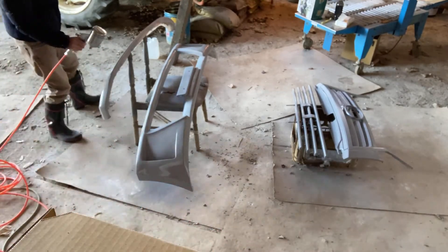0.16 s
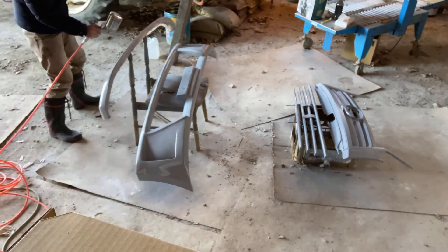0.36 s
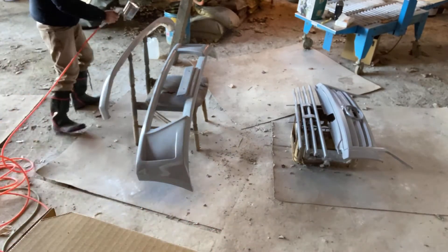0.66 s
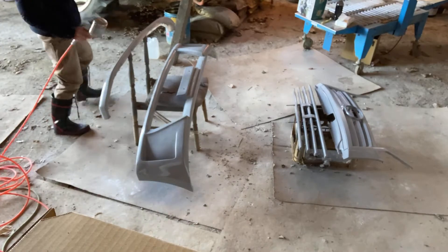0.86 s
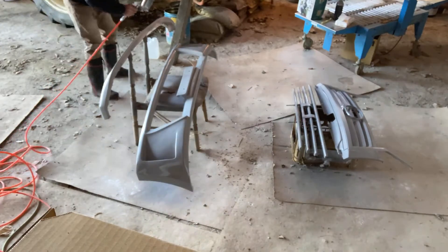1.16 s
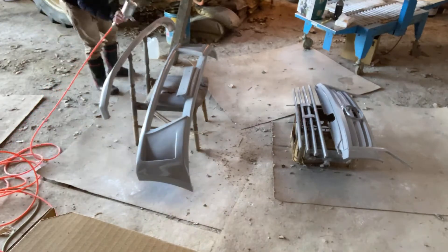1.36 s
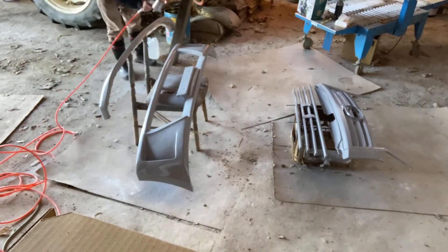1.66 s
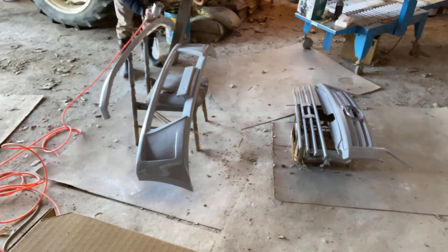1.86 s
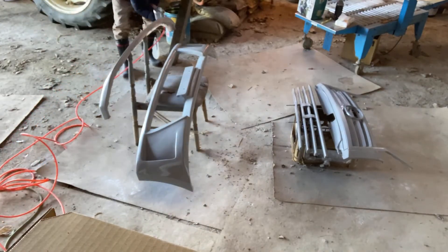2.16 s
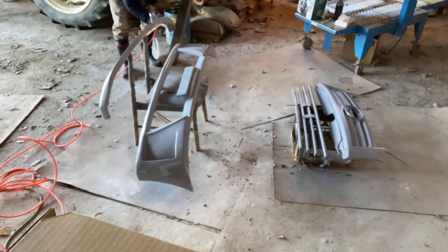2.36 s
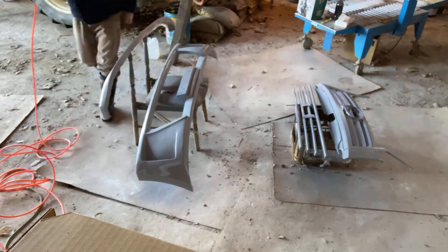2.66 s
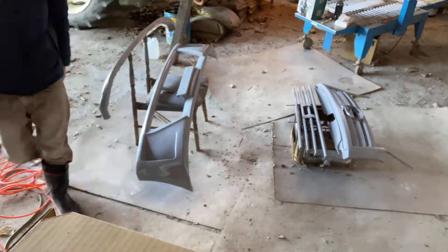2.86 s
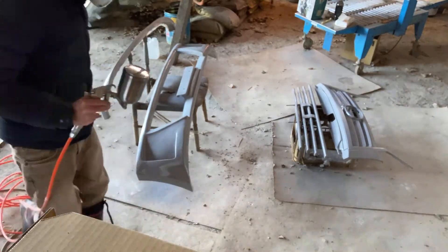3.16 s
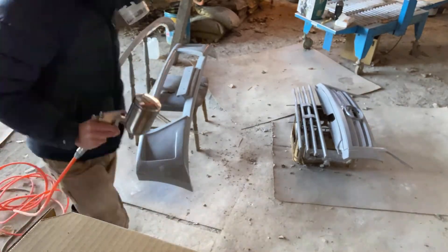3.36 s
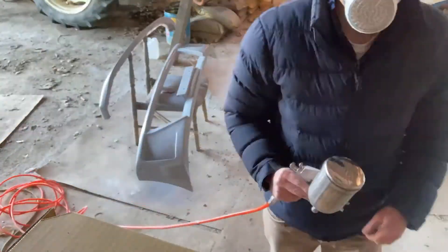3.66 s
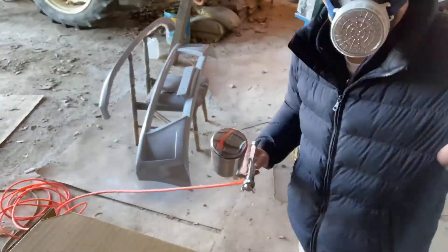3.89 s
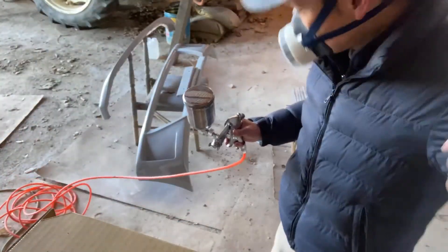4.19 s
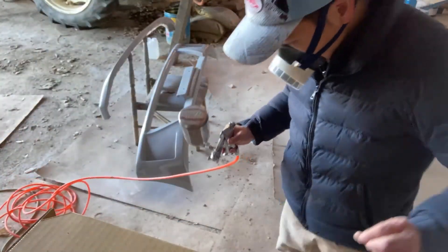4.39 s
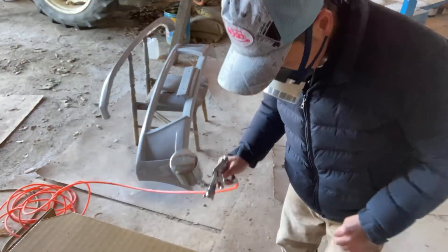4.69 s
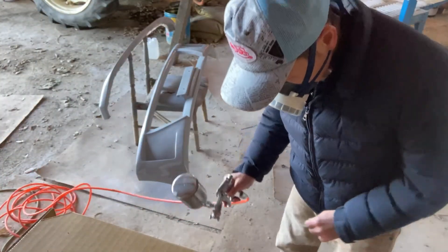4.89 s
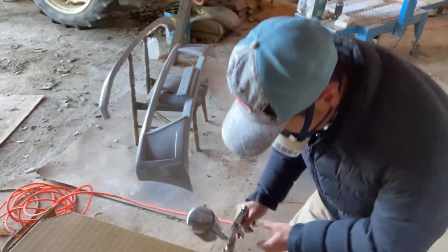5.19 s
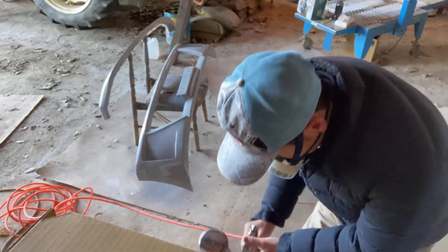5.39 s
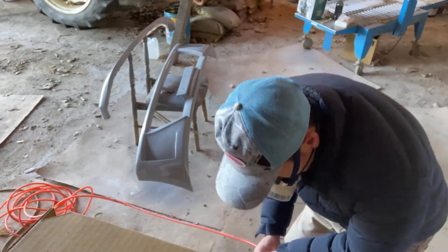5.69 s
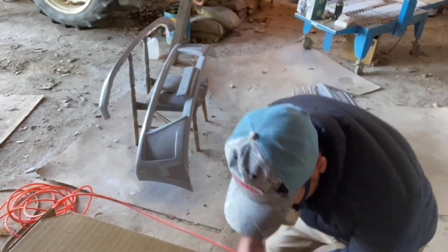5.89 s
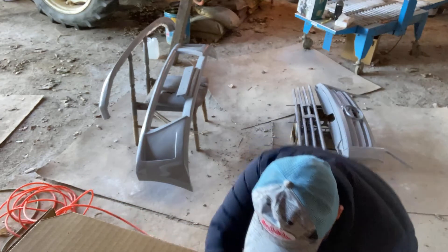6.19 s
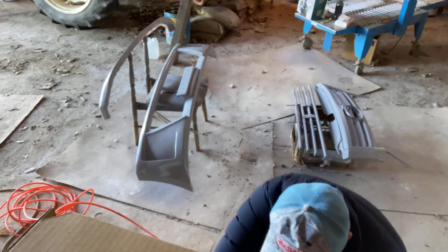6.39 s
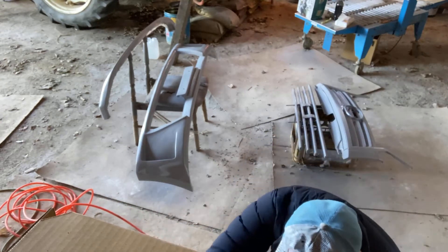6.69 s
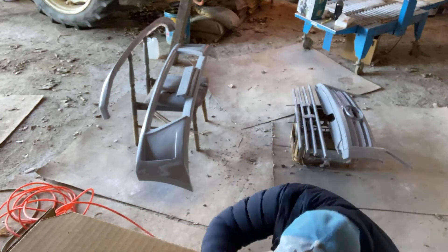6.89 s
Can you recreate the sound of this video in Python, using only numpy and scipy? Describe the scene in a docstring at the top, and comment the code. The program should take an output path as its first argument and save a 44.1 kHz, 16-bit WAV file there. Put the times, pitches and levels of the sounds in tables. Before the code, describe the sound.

Quiet electric-like hum and whine for four seconds, then a piston air compressor suddenly pounds loudly, clattering and fluttering with a soft air hiss.

```python
"""A barn workshop: a two-cylinder air compressor runs while a painter moves about with a spray gun.
For four seconds time runs about six times too fast: intake strokes fuse into a faint hum and whine.
Then time drops to its true pace: a loud, throbbing drone of tones at multiples of the stroke rate,
with one burst of valve flutter a stroke, clattering noise and reed ticks. Shaped noise makes the
air that leaks from the gun, the scuffs of boots, hose and jacket, and the footfalls."""
import sys
import numpy as np
from scipy.fft import rfft, irfft, next_fast_len
from scipy.io import wavfile
from scipy.ndimage import map_coordinates

SR = 44100
rng = np.random.default_rng(int(sys.argv[2]) if len(sys.argv) > 2 else 0)


def generate_wav(signal):
    """Clip the signal to [-1, 1] and save it as 16-bit WAV at the path in sys.argv[1]."""
    frames = np.transpose(np.atleast_2d(signal))
    scaled = np.clip(frames, -1, 1) * 32767
    pcm = np.round(scaled).astype(np.int16)
    wavfile.write(sys.argv[1], SR, pcm)


N = 310905

CUT = 4.042  # moment when time drops to its true pace (s)
STROKE_HZ = 28.95  # strokes a second at true pace; one "turn" below is one stroke
HASTE = 6  # how many times faster the hastened clatter runs


def amp(db):
    """Decibels to gain."""
    return 10 ** (np.asarray(db) / 20)


def unit(x):
    """Scaled to rms 1."""
    return x / np.sqrt(np.mean(x ** 2) + 1e-20)


def clock():
    """The time of every sample (s)."""
    return np.arange(N) / SR


def along(points, hz):
    """Values at hz between (Hz, value) points, on a log frequency axis."""
    f, v = np.transpose(points)
    return np.interp(np.log(hz + 1), np.log(f + 1), v)


def curves(rows):
    """One value per sample for each column after the time."""
    s, *cols = np.transpose(rows)
    return [np.interp(clock(), s, c) for c in cols]


def wobble(rate):
    """A smooth random curve, rate knots a second."""
    knots = rng.standard_normal(int(N * rate / SR) + 4)
    return map_coordinates(knots, [clock() * rate])


def filtered(x, response):
    """x shaped by a complex response of frequency."""
    m = next_fast_len(N + SR // 2)
    spectrum = rfft(x, m) * response(np.fft.rfftfreq(m, 1 / SR))
    return irfft(spectrum, m)[..., :N]


def bell(f, hz, octaves):
    """A bell of gain around hz."""
    return np.exp(-.5 * (np.log2((f + 1) / hz) / octaves) ** 2)


def band(hz, octaves):
    """Stereo noise of rms 1 in a bell around hz."""
    return unit(filtered(rng.standard_normal((2, N)), lambda f: bell(f, hz, octaves)))


def placed(x, balance, lag_ms):
    """Sound reaches the right microphone lag_ms after the left; balance is left minus right in dB."""
    side = np.array([[.5], [-.5]])

    def at_microphones(hz):
        delay = np.exp(2j * np.pi * hz * side * lag_ms / 10 ** 3)
        return amp(side * along(balance, hz)) * delay
    return filtered(x, at_microphones)


def hum(hz, db):
    """The motor's iron buzzes at twice the mains frequency: a sine of rms level db."""
    return amp(db) * np.sqrt(2) * np.sin(2 * np.pi * hz * clock())


def steps():
    """Boots land on the loose sheets that cover the floor: a sudden, dull tap that dies away."""
    # Each row: landing in seconds, level in dB.
    footfalls = [(.91, -64), (1.015, -65), (1.52, -67), (2.624, -57), (2.84, -64)]
    t60_s = .13
    t = clock()
    taps = sum((t > s) * amp(db - 60 * np.abs(t - s) / t60_s) for s, db in footfalls)
    return band(hz=800, octaves=0.79) * taps


def scuffs():
    """Boots, hose and jacket scuff: short swells of rubbing noise as the painter steps and handles hose."""
    # Each row: peak in seconds, length in s, centre in Hz, width in octaves, level in dB.
    rubs = [(3.53, .15, 4700, .25, -68), (3.973, .022, 380, .3, -61), (5.218, .017, 1850, .25, -38.5)]
    t = clock()
    out = np.zeros((2, N))
    for s, length, hz, octaves, db in rubs:
        out += amp(db) * band(hz, octaves) * np.exp(-2 * ((t - s) / length) ** 2)
    return out


def air_leak():
    """Air hisses softly from the gun's coupling, close by on the right; it wavers and twice spurts."""
    # The hiss's colour. Each row: frequency in Hz, relative level in dB.
    air_colour = [(500, -8), (4000, 13), (6500, 4.5), (8300, 9), (10000, 1), (13000, 4.5), (15500, -2)]
    # The hiss's level before its waver. Each row: time in seconds, level in dB.
    leak_levels = [(4.1, -50), (4.35, -49), (4.58, -51), (4.85, -48.5), (5.55, -50), (6.05, -49.5),
                   (6.6, -51.5), (7, -50)]
    # Short spurts of air. Each row: peak in seconds, length in s, level in dB.
    puffs = [(5.232, 0.043, -46.5), (6.875, .018, -50)]
    noise = rng.standard_normal((3, N))
    nearly_mono = noise[0] + 0.045 * noise[1:]
    hiss = unit(filtered(nearly_mono, lambda hz: amp(along(air_colour, hz))))
    level_db, = curves(leak_levels)
    spurts = sum(amp(db) * np.exp(-2 * ((clock() - s) / length) ** 2) for s, length, db in puffs)
    spurts = spurts * band(hz=8700, octaves=0.41)[0]
    hiss = amp(level_db + 0.68 * wobble(24)) * hiss
    # negative lag: the right microphone hears it first
    return placed(hiss + spurts, [(8000, 0)], lag_ms=-0.2447)


def rattle(turns, pace):
    """Three unrelated noises; part of each is a cylinder's own pattern, back every second stroke."""
    # How much is the same on each stroke of one cylinder.
    # Each row: frequency in Hz at true pace, share of the power from 0 to 1.
    repeats = [(400, .25), (850, .28), (1100, .62), (1600, .58), (2500, .38), (4000, .2), (7000, .08)]
    size = round(2 * SR / STROKE_HZ / pace)
    place = turns / 2 % 1 * size
    patterns = rng.standard_normal((3, size))
    same = np.array([map_coordinates(row, [place], mode="grid-wrap") for row in patterns])
    fresh = rng.standard_normal((3, N))

    def share(hz):
        return np.clip(along(repeats, hz / pace), 0, 1)
    same = filtered(same, lambda hz: np.sqrt(share(hz)))
    return same + filtered(fresh, lambda hz: np.sqrt(1 - share(hz)))


def swell(turns):
    """The clatter's rise in dB before scaling: up as the valve opens, a hold, then dying away."""
    start, attack, hold, release = 0.862, 0.048, 0.32, 0.26  # shares of the turn
    corners = np.cumsum([0, attack, hold, release])
    return 6.5 * np.interp((turns - start) % 1, corners, [0, 1, 1, 0])


def clatter(turns, pace, spectrum, apart, throb, ringing):
    """Valve and bearing noise of rms 1 swells once a stroke and rings the casing."""
    # Resonances and dips of the cylinder head and tank, with dB to be scaled by ringing.
    # Each row: frequency in Hz at true pace, width in Hz, gain in dB.
    casing = [(980, 64, -3), (1080, 130, 3), (1408, 102, -18), (1523, 83, 6), (1860, 80, -14),
              (1941, 30, 5.5), (2057, 33, 5.5), (2470, 47, 11), (2804, 34, 10.5), (3640, 42, 12.5),
              (3830, 88, -22), (4160, 160, 8), (5420, 210, 13)]
    noise = rattle(turns, pace)
    # direct sound is common to both sides, the walls' answer is not
    pair = (noise[0] + apart * noise[1:]) * amp(throb * swell(turns))

    def ring(f):
        total = 1
        for centre, width, db in casing:
            resonance = 1j * f * width / (centre * centre - f * f + 1j * f * width)
            total = total + (amp(ringing * db) - 1) * resonance
        return total
    return unit(filtered(pair, lambda hz: amp(along(spectrum, hz)) * ring(hz / pace)))


def ticks(turns, scatter_db, scatter_share):
    """Reeds slap stop and seat: sharp, quickly dying ticks, each cylinder's at its own points of the turn."""
    # Rows alternate between the two cylinders. Each row: point in the turn, decay to 1/e as
    # a share of the turn, centre in Hz, mean level in dB.
    slaps = [(-.01, .13, 3600, -36), (.175, .1, 3200, -35.5), (.02, .12, 2200, -38), (-.03, .1, 1300, -35)]
    out, noise = np.zeros((2, N)), rattle(turns, 1)
    for cylinder, (point, decay, hz, db) in zip(np.arange(len(slaps)) % 2, slaps):
        # each cylinder strikes every second stroke, with fresh size and timing
        cycle = np.floor((turns - cylinder) / 2 + 1 / 4).astype(int)
        draws = rng.standard_normal((cycle[-1] - cycle[0] + 1, 2))
        size, slip = draws[cycle - cycle[0]].T
        since = turns - 2 * cycle - cylinder - point - scatter_share * slip
        envelope = (since > 0) * np.exp(-np.abs(since / decay))
        metal = unit(filtered(noise[0] + noise[1:], lambda f: bell(f, hz, octaves=0.27)))
        out += envelope * amp(db + scatter_db * size) * metal
    return out


def flutter(turns, levels, drift_db, top_drift_db, bright_db, count=20):
    """Tones phased as a gulp of air, a reed flapping ever wider and wall echoes; levels set their strength."""
    # Echoes of the intake off floor and near walls. Each row: gain, delay as a share of the turn.
    wall_echoes = [(.59, .129), (.43, .171), (.6, .228)]
    open_share, flaps = .417, 6  # share of the turn that the valve is open, flaps in that time
    grows_db = 6.3  # growth of the swing while the valve is open
    reed_stop = .72  # limit of the downward swing, wider than this swing gets
    gulp, gulp_rise = 1.04, .053  # peak on the swing's scale, rise as a share of the turn
    u = np.linspace(0, 1, 2 ** 11, endpoint=False) / open_share
    swing = np.sin(2 * np.pi * flaps * u) * amp(grows_db * (u - 2)) * (u < 1)
    rise = u * open_share / gulp_rise
    suction = gulp * rise * np.exp(1 - rise)
    orders = np.arange(1, len(levels) + 1)
    burst = rfft(np.maximum(swing, -reed_stop) - suction)[orders]
    echoes = sum(gain * np.exp(-2j * np.pi * orders * delay) for gain, delay in wall_echoes)
    phases = np.angle(burst * (1 + echoes))
    crank = (2 * np.pi * (turns % 1)).astype(np.float32)
    progress = np.linspace(0, count - 1, N)
    out = np.zeros(N)
    for k, ((_, db), phase) in enumerate(zip(levels, phases), 1):
        # each tone's strength drifts as the painter moves through the barn
        height = (k / len(levels)) ** 2
        drift = (drift_db + top_drift_db * height ** 2) * rng.standard_normal(count)
        strength = np.interp(progress, np.arange(count), amp(db + bright_db * height + drift))
        out += strength * np.cos(k * crank + float(phase))
    return np.sqrt(2) * out


def whine():
    """Hastened strokes fuse into a thin, buzzing pitch; its colour shifts as the painter comes near."""
    # It gains a little speed, then sags. Each row: time in seconds, strokes a second.
    stroke_rates = [(0, 174.68), (2.35, 175.56), (4, 174.4)]
    # Gain of the treble. Each row: time in seconds, gain in dB.
    treble = [(0, -0.5), (.5, -2.5), (1.45, -0.5), (2.6, -0.5), (2.9, -5), (3.2, -4), (3.53, 2), (3.7, -3),
              (4, 2.5)]
    # Tones of intake and tank. Each row: multiple of the stroke rate, relative level in dB.
    tones = [(1, -33), (2, -10), (3, -25), (4, -13), (5, -15), (6, -19), (7, -23), (8, -13), (9, -14),
             (10, -14), (11, -6), (12, -16), (13, 0), (14, -3.5), (15, 0), (16, -16), (17, -9), (18, -9.5),
             (19, -15), (20, -40), (21, -24), (22, -19), (23, -16), (24, -23), (25, -17), (26, -18),
             (27, -20), (28, -21), (29, -14), (30, -29), (31, -28)]
    # What the tones gain with the painter near. Each row: frequency in Hz, gain in dB.
    near_colour = [(1600, 1.5), (1925, -1.5), (2275, 3), (2450, 0), (2630, -1.5), (2980, -23), (3150, -1),
                   (3700, -2), (5080, 0), (5430, -17)]
    # Noise of valves and bearings. Each row: frequency in Hz, relative level in dB.
    fizz_colour = [(100, -124), (200, -114), (350, -99), (600, -104), (1200, -106.5), (1800, -100),
                   (2400, -90.5), (3100, -91.5), (3380, -99), (3550, -111), (3750, -100), (4200, -99.5),
                   (5200, -93), (6000, -100.5), (9500, -96.5), (12000, -100.5), (15000, -102.5)]
    # Left minus right. Each row: frequency in Hz, difference in dB.
    balance = [(400, -1.5), (1300, -1), (2400, 0.9), (4400, 1), (8000, 4)]
    away_s, away_half_s = 1.8, 1.74  # painter at the far end: middle and half length of that time
    first_turn = .462  # start of the first stroke, as a share of the turn
    rate, = curves(stroke_rates)
    treble_db, = curves(treble)
    near = 1 - np.exp(-np.square(((clock() - away_s) / away_half_s) ** 2))
    turns = np.cumsum(rate) / SR - first_turn + .0003 * wobble(60)
    tone = flutter(turns, tones, drift_db=.5, top_drift_db=1.5, bright_db=3)
    tone = tone * amp(-49 + 0.14 * wobble(83))
    near_tone = filtered(tone, lambda hz: amp(along(near_colour, hz)))
    tone = (1 - near) * tone + near * near_tone
    uneven_turns = turns + .001 * wobble(40)
    fizz = clatter(uneven_turns, HASTE, fizz_colour, apart=1.7, throb=0.76, ringing=0.27)
    buzz = tone + amp(-52.5 + 1.5 * near) * fizz
    top = filtered(buzz, lambda f: bell(f, hz=4470, octaves=0.19))
    buzz = buzz + (amp(treble_db) - 1) * top
    return placed(buzz + hum(hz=720.3, db=-71), balance, lag_ms=0.055)


def drone():
    """At true pace each stroke's intake flutters, while the two cylinders clatter in turn."""
    # Tones of intake and tank. Each row: multiple of the stroke rate, relative level in dB.
    tones = [(1, -32), (2, -12), (3, -23), (4, -15), (5, -14), (6, -21), (7, -21), (8, -17), (9, -15),
             (10, -18), (11, -11), (12, -21), (13, -3), (14, 0), (15, -2), (16, -15), (17, -16.5),
             (18, -15), (19, -18), (20, -27), (21, -34), (22, -25), (23, -18), (24, -25), (25, -19),
             (26, -16), (27, -20), (28, -22), (29, -20), (30, -31), (31, -23), (32, -26), (33, -38),
             (34, -40), (35, -38), (36, -27)]
    # Noise of valves and bearings. Each row: frequency in Hz, relative level in dB.
    clatter_colour = [(20, -87), (60, -62.5), (280, -70), (400, -48), (600, -72), (780, -57), (980, -66),
                      (1400, -60.5), (2200, -65.5), (3300, -72), (4200, -78), (4700, -82.5), (6500, -88),
                      (15000, -108)]
    # Left minus right. Each row: frequency in Hz, difference in dB.
    balance = [(200, -2), (400, 0.5), (700, 1.5), (1300, 6.5), (2400, 3), (4400, 3.5), (8000, -0.5)]
    first_stroke_s = 4.0529  # start of the first stroke heard at true pace
    turns = (clock() - first_stroke_s) * STROKE_HZ + .001 * wobble(2) + .0005 * wobble(29)
    tone = flutter(turns, tones, drift_db=.5, top_drift_db=1, bright_db=2)
    tone = tone * amp(.25 * wobble(29))
    valves = clatter(turns, 1, clatter_colour, apart=1.2, throb=1.05, ringing=1)
    valves = valves * amp(.6 * wobble(29))
    reeds = ticks(turns, scatter_db=1.8, scatter_share=.008)
    motor = hum(hz=120.06, db=-53)
    machine = amp(-28) * tone + amp(-33.0) * valves + reeds + motor
    return placed(machine, balance, lag_ms=0.3)


def scene():
    """The whine gives way to the drone and the leak within about 12 ms; scuffs and steps run across both."""
    true_pace = np.clip((clock() - CUT) / 0.012, 0, 1)
    hastened = np.clip((CUT - clock()) / 0.0011, 0, 1)
    compressor = hastened * whine() + true_pace * (drone() + air_leak())
    return compressor + scuffs() + steps()


def record(dry):
    """The microphone keeps nothing above its band limit."""
    top_hz = 15720
    return filtered(dry, lambda hz: hz < top_hz)


dry = scene()
out = record(dry)
generate_wav(out)
```